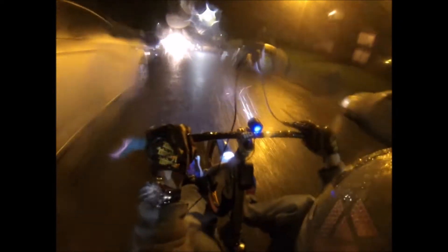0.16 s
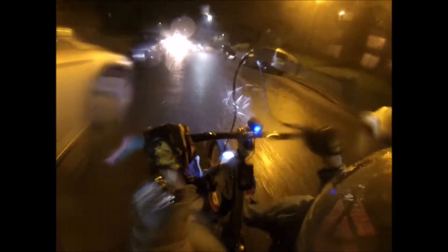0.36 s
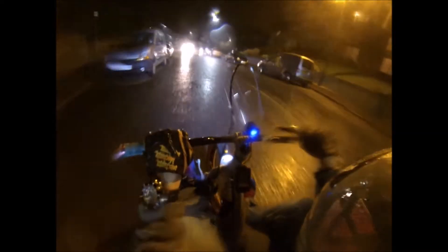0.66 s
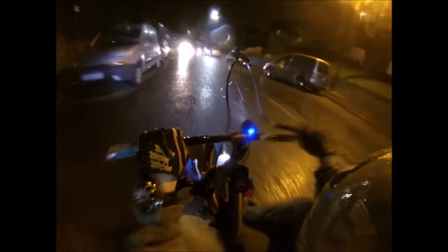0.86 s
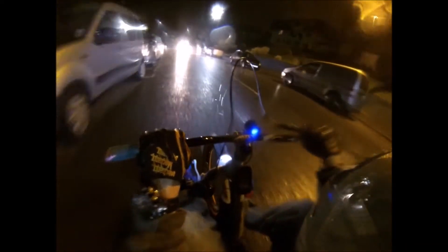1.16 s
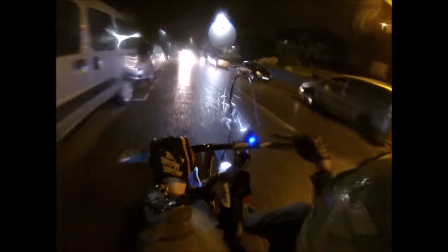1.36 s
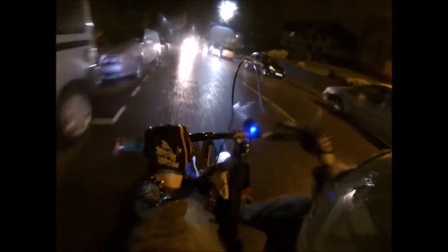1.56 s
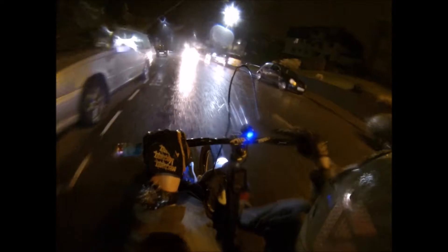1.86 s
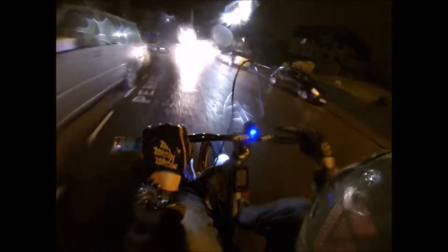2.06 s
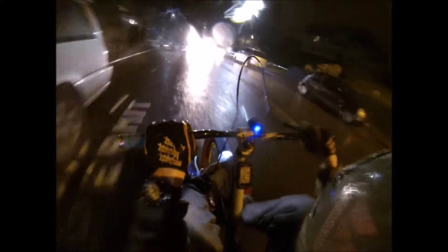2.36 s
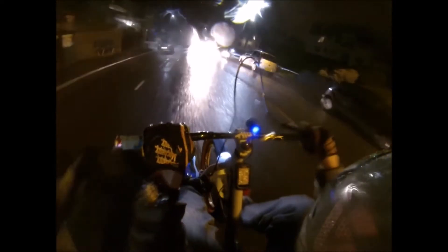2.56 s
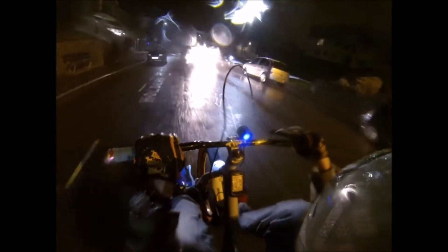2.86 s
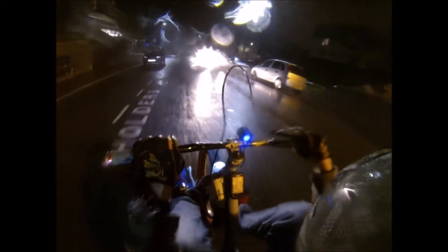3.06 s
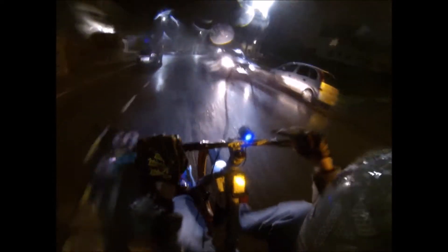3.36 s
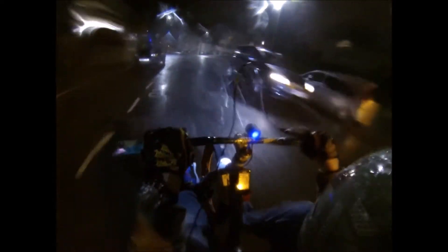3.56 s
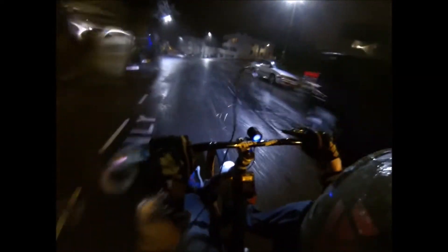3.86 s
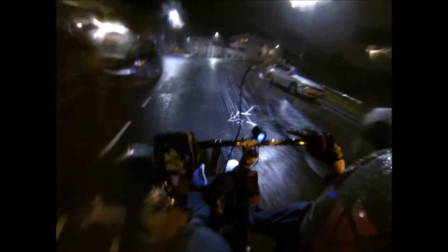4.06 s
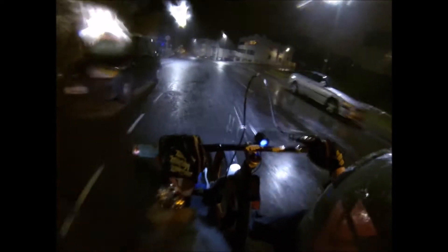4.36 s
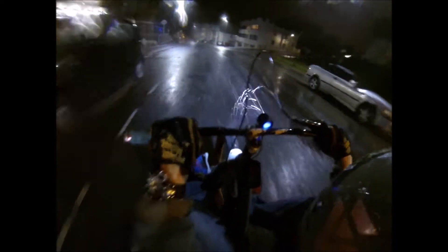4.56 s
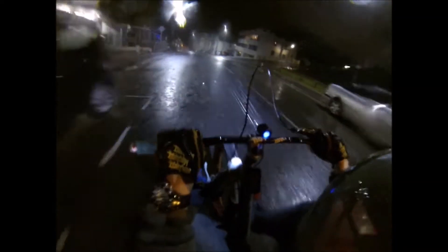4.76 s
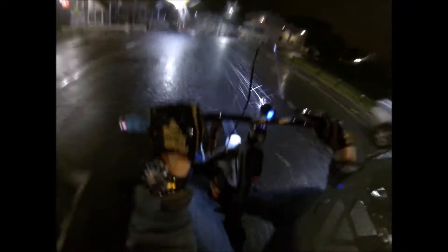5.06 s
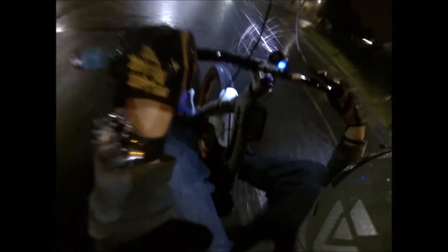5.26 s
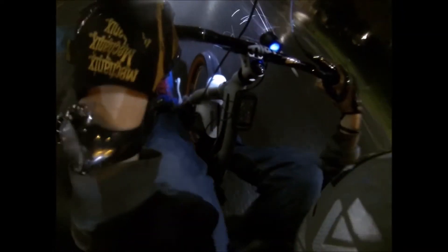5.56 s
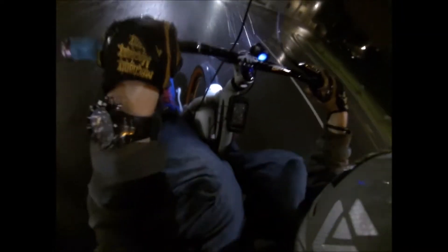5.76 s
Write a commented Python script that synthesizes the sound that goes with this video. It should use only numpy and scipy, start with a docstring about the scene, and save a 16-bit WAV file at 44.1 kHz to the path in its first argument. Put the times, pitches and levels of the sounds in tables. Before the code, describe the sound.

From the start, a drift trike's wheels roar over wet asphalt, heard close from an on-board microphone inside a waterproof case. The roar is hollow and boxy, with a watery hiss above it and road rumble, vibration and deep wind buffeting below. It runs for about six seconds, swelling around 0.3, 1.3, 2.6, 4 and 4.8 seconds and easing briefly in between.

Water patters on the case throughout as fine spray and sharp, irregular smacks. The hardest drops land in the first half second and near 1.4, 2.7, 3.1, 4.1, 5.2 and 5.7 seconds.

Bumps knock the frame dully at about 1.3, 3 and 3.7 seconds, with a low shudder around 3 seconds. Loose metal fittings clack near 1.7 and 2.6 seconds, then several times in quick succession at 5.6 seconds. The wheels are still rolling at the end.

```python
"""The wheels of a drift trike roar down a wet road at night, heard close from on board: one microphone
in a waterproof camera case. The roar rings the hollow case, the asphalt rumbles, the water film hisses.
Water thrown up by the front tyre smacks the case, right at the microphone. Bumps knock the frame and
loose fittings clack. Underneath, the rough road shakes the mount and wind buffets the case."""
import sys
import numpy as np
from scipy import signal
from scipy.fft import rfft, irfft
from scipy.io import wavfile
from scipy.ndimage import uniform_filter1d

SR = 44100
rng = np.random.default_rng(int(sys.argv[2]) if len(sys.argv) > 2 else 0)


def wrap_up_sound(samples):
    """Save the sound to the file named by the first command line argument, as 16-bit audio."""
    columns = np.atleast_2d(samples).T
    # keep every value between -1 and 1, then stretch to whole-number steps
    tamed = np.clip(columns, -1, 1)
    steps = np.round(tamed * 32767).astype(np.int16)
    wavfile.write(sys.argv[1], SR, steps)


N = 260190

# How hard the wheels grind and how much water they throw up: t/s, roar level/dB, spray level/dB
WHEEL_LEVELS = [(0.0, -25.5, -39.5), (0.12, -27, -37.5), (0.25, -25, -39), (0.36, -24, -32.5),
                (0.5, -26.5, -39.5), (0.85, -31, -44), (1.13, -27, -42.5), (1.28, -25, -37.5),
                (1.42, -29, -43.5), (1.62, -30.5, -44.5), (1.9, -27, -40.5), (2.25, -26, -37.5),
                (2.48, -24, -37.5), (2.63, -23, -37.5), (2.79, -23.5, -40), (2.95, -25, -39),
                (3.06, -24, -34), (3.16, -30, -41), (3.38, -31, -41.5), (3.72, -27, -36),
                (3.89, -26, -37.5), (4.25, -26, -38.5), (4.5, -31.5, -40.5), (4.64, -31, -42.5),
                (4.8, -25.5, -36), (5.01, -29, -39), (5.15, -25.5, -38.5), (5.31, -32.5, -46.5),
                (5.52, -32.5, -48), (5.63, -26.5, -40), (5.78, -29.5, -46), (5.9, -29, -43)]
# The roar as it sounds inside the hollow case: f/Hz, level/dB
ROAR_SPECTRUM = [(500, -67), (850, -42), (1000, -17.5), (1150, -9), (1300, 0.5), (1400, 1), (1580, 0),
                 (1800, -12.5), (2000, -16), (2400, -16), (4000, -49)]
# The water film under the tyres: f/Hz, level/dB
WATER_SPECTRUM = [(1300, -17), (2000, -2), (2400, -1.5), (2750, 2.5), (3300, -2.5), (3850, -9.5),
                  (4150, -8), (4650, -14.5), (5000, 1), (5400, -12), (7000, -21.5), (14000, -39),
                  (16000, -70)]
def wheels(grit, swell):
    """Close by, tyres grind over wet grit: the roar rings the case's cavity and the water film hisses."""
    roar = coloured(noise() * gain_of(2 * grit), ROAR_SPECTRUM)
    hiss = coloured(noise() * gain_of(3 * grit - 1.5 * wander(250)), WATER_SPECTRUM)
    roar *= gain_of(1 + 0.3 * swell) * level(WHEEL_LEVELS)
    hiss *= gain_of(3.5 * swell) * level(WHEEL_LEVELS, column=2)
    return roar + hiss


# The roughness of the asphalt passing under the trike: t/s, rumble level/dB
ROAD_LEVELS = [(0.0, -35.5), (0.12, -36), (0.22, -42.5), (0.35, -39), (0.5, -42), (0.8, -46.5), (1.05, -41),
               (1.33, -40.5), (1.43, -47.5), (1.6, -46), (1.8, -42), (2.3, -38), (2.62, -38), (2.76, -40),
               (3.0, -38), (3.2, -43), (3.7, -38), (4.0, -38.5), (4.3, -39.5), (4.6, -43), (4.8, -39.5),
               (5.1, -39.5), (5.27, -45), (5.45, -43.5), (5.9, -38.5)]
# Its rumble at the microphone: f/Hz, level/dB
ROAD_SPECTRUM = [(60, -21), (130, 10.5), (230, 5), (350, 3), (600, -1.5), (900, 0), (1500, 4), (4000, -56)]
def road_rumble(grit, swell):
    """The tyres rumble over the asphalt below, louder where it is rough."""
    rumble = coloured(noise() * gain_of(grit), ROAD_SPECTRUM)
    return gain_of(0.3 * swell) * level(ROAD_LEVELS) * rumble


# Resonances of the case around the microphone, all four: f/Hz, width/Hz, level/dB
HOLLOW_MODES = [(1400, 60, 0.18), (1534, 660, -1.1)]  # the cavity's hollow ring
WALL_MODES = [(2347, 770, 16), (2710, 180, 25.5), (3040, 250, -2)]  # the ring of the wall
SNAP_MODES = [(4350, 1400, 1), (5100, 180, 9.5), (6090, 420, 0)]  # the snap of the shell
FIZZ_MODES = [(7800, 1100, 0), (10500, 3000, -3), (13000, 2000, -12)]  # the fizz on top
def drop(hollow_db, snap_db, fizz_db, wall_hz, snap_hz, splash=0.62):
    """A drop bursts on the case; the spot it hits sets the pitch of the wall and of the shell."""
    t = np.arange(1024) / SR
    burst = splash * (np.exp(-t / 0.0011) + gain_of(-25) * np.exp(-t / 0.0087))
    force = (t == 0) + burst * noise(len(t))
    force = signal.sosfilt(butter(3, 1150, "high"), force)  # the stiff case passes little bass
    detune = 1 + 0.06 * rng.uniform(-0.91, 1)
    parts = [(HOLLOW_MODES, hollow_db, detune),
             (WALL_MODES, 0, wall_hz / WALL_MODES[1][0]),
             (SNAP_MODES, snap_db, snap_hz / SNAP_MODES[1][0]),
             (FIZZ_MODES, snap_db + fizz_db, detune)]
    out = 0
    for k, (modes, db, stretch) in enumerate(parts):
        band_hz = [modes[0][0] * stretch * 0.83, min(modes[-1][0] * stretch * 1.18, 0.45 * SR)]
        sound = signal.sosfilt(butter(2, band_hz), ring(force, modes, stretch))
        polarity = (-1) ** k  # neighbouring modes swing in opposite senses
        out += polarity * gain_of(db) * sound / rms(sound[t < 0.004])
    return out


# Drops that smack the case one by one, from hard smacks to faint ticks: t/s, wall level/dB, hollow/dB re wall,
# # snap/dB re wall, fizz/dB re snap, wall f/Hz, shell f/Hz
TIMED_DROPS = [(0.0812, -5, -18, -11, -19, 2720, 5700), (0.119, -7.5, -4.5, -2.5, -8, 2920, 5360),
               (0.1385, -13.5, -1, 1, -6, 2700, 4530), (0.1426, -15, -13.5, -6.0, -12.5, 2350, 4060),
               (0.16, -12, -3, -17, -7.0, 2570, 5100.0), (0.1737, -27, -4, -3, 1, 2700, 5000),
               (0.182, -27, -4, -1, -1, 2600, 4900), (0.224, -15.5, -3, -2, -3.5, 2780, 4960),
               (0.2571, -21.5, -2, 1, -2, 2860.0, 4500.0), (0.3077, -25.5, 3, 1, -3, 2700, 4820),
               (0.3355, -20.5, 4, -12, 9, 3400, 4720.0), (0.342, -13.5, 0, -7.5, 1, 2940, 5640.0),
               (0.358, -22, 1, 2, -8, 2600, 4500), (0.367, -13.5, 0, -1, 0, 2600, 4200),
               (0.386, -5.5, -15, -5.5, -1.5, 2700, 4370), (0.391, -13, -14, 5, -7.0, 2670, 5140),
               (0.421, -23, -7, 0, -16, 2800.0, 4560), (0.4279, -8.5, -8, -11, -3, 2740, 5500),
               (0.4346, -16, -7, -12.5, -3, 2840.0, 5490.0), (0.469, -25.5, -4, 10, -8, 2560, 5200),
               (0.4844, -15.5, -16, -7, -6, 2900, 4970.0), (0.6058, -33.5, 3, 9.5, -20, 2880, 4070),
               (0.6277, -28.5, -11.5, 6.5, -6, 3170, 5360), (0.6432, -20.5, -15, -5, -8, 2800, 5040),
               (0.668, -8.5, -7, -15.5, 6, 2870, 5060), (0.7772, -21, -4, -5, 1, 2600, 4900),
               (0.8177, -18.5, -3, -5.5, -1, 2600, 4800), (0.9522, -27, 10.5, 5.5, -5, 3170, 4760),
               (1.0993, -38, -4, -6, 15, 2700, 4960), (1.1494, -11, -12, -8, -7, 2730, 4900),
               (1.1717, -28.5, -4, 3, -10, 2700, 5100), (1.1921, -35, -10, 2.5, 2, 2600, 4900),
               (1.2865, -13.5, -2.5, 3, -15, 2470, 5500), (1.326, -25.5, 3, 4, -8, 2800, 4900),
               (1.3732, -4.5, -10, -9, 1.5, 2700, 4350), (1.4743, -34, -4, 6, 0.5, 2700, 5070),
               (1.5228, -7, -10, -7, -10, 2770, 4980), (1.5381, -19.5, 2.5, -10, -11, 2600, 5860.0),
               (1.6036, -29.5, -7.5, 2.5, 1, 2710.0, 4280), (1.6821, -26, 9.5, -12, -5, 2270, 5000),
               (1.69, -17.5, -21.0, -27, -8.0, 2800, 5700), (1.7298, -38, 23.5, 6, -3, 2540.0, 4100),
               (1.7662, -27.5, 0, 1, 0, 2600, 5000), (1.772, -21.5, -12, -7, -7, 2700, 4970),
               (1.8105, -22, -6, -22, -16, 2610, 4800), (1.913, -30, -7.0, 2, 2, 2670.0, 4470),
               (1.9166, -27, 2, -4, -12, 2680, 4900), (1.9282, -25.5, -4, -1, -2, 2760, 5070),
               (1.967, -21, 3, -2.5, -7, 2600, 4950), (1.9802, -14, 3.5, -11, -13, 2710.0, 4350.0),
               (2.072, -21.5, 4, 2, -7, 2820, 4630), (2.087, -26, 5, -2, 1, 2700, 5040),
               (2.1965, -12, -20.0, -5, -6, 2660, 6130), (2.2176, -19, -12, -0.5, -17, 2780, 6400),
               (2.229, -20, -14, -0.5, -5, 2710.0, 4940), (2.237, -27, -10.5, -3, -10, 2700, 4850),
               (2.2431, -19, -17, -8.5, 7, 2660, 5460), (2.271, -24, -12, -6, 9, 3250.0, 5000),
               (2.319, -25, 5, 4.5, -8, 2850, 4870), (2.331, -24, -6, 0, -4, 2700, 5300),
               (2.3459, -27, 1, 8, -11, 2520.0, 5250), (2.357, -20.5, 4.5, 3.5, -5, 2900, 5560.0),
               (2.4136, -12, 3, -25, -16, 2480, 5100), (2.46, -25, 12, -2, -2, 2700, 4900),
               (2.501, -21, -5, -4.5, -4, 3000, 5140), (2.5475, -18.5, -9, 1, -5, 2540, 5330),
               (2.556, -28.5, -3, 7.5, -3, 2700, 5060), (2.5618, -26, 2, 0, -10, 2840, 5300),
               (2.5917, -25.5, -5, 0, -18, 2760.0, 4820.0), (2.6224, -14.5, -4, 0, -12, 2830, 5530.0),
               (2.654, -6, -23, -9.5, -21, 2850, 5500), (2.6636, -5.5, -1.5, -6, -12, 2860, 5000),
               (2.7293, -20.5, -1, -3, -5, 2700, 4290.0), (2.7402, -17.5, -12, 3.5, -3, 2500, 4800),
               (2.755, -7, -21, -12.5, 6.5, 2730, 5200), (2.8667, -21, 5, 3, -24, 2750, 4460),
               (2.9349, -33, 8.5, 4.5, 6.5, 2700, 4930), (3.0068, -18.5, 2, -0.5, -10.5, 2590, 4800),
               (3.0242, -29, 10, 3, -2, 2600, 4700), (3.0841, -8, -5, -3, -9, 2660, 4300),
               (3.0973, -21.5, 4.5, -4, 5, 2680, 4960), (3.1463, -14, -17, 0, -1.5, 2950, 5100),
               (3.1596, -21, -3, -5.5, -4, 2750, 5000), (3.1757, -26, 7, -5.5, -9, 2630, 4770),
               (3.2934, -38.5, -4, 7, 0, 2700, 5100), (3.3351, -26.5, 4.5, -4, -3, 2800, 4860),
               (3.608, -25, 3, 4.5, -5, 2860, 5350), (3.6315, -26, -12, 4, 0, 2500, 5000),
               (3.655, -21.5, 5.5, -4, -1, 2730, 5000), (3.6736, -21, 5, 3.5, -1.5, 2670.0, 4900),
               (3.6895, -20, -10, -13, -13, 2780, 4900), (3.735, -23.5, 8, -1.5, 2.5, 2540.0, 4040),
               (3.7586, -27, 0, 3, -10, 3170.0, 4500.0), (3.7706, -11.5, 2.5, -2, -7.5, 2590, 4420),
               (3.8063, -11.5, -26, -8, -1, 2710.0, 4560), (3.8382, -18, -8, -5.5, 2.5, 2750, 5000),
               (3.8422, -23, 9, -2, -1, 3400, 4750), (3.874, -14, -11, -9, -12.0, 2790, 5430),
               (3.9325, -14, -14, -8, -4, 2780, 5000), (3.945, -23.5, 5, -1, -9, 2680, 4570),
               (4.0236, -21, 8.5, 5.5, -1, 2750, 4800), (4.035, -25, -9, 4, -1, 2700, 5100),
               (4.0584, -17.5, -2, -9.5, -2, 2720, 4970.0), (4.0831, -7, -19.0, -3, -10.5, 2810, 5350),
               (4.135, -26, 2, -4, 3, 2680, 4970), (4.168, -24.5, 10.5, -4, -4, 2670, 4060),
               (4.2008, -22.5, 8, -2.5, 3, 3300, 4840), (4.2206, -29.5, 2.5, 5, -8, 3060, 4630),
               (4.261, -17.5, 6.5, 2, -10, 2660, 4400), (4.359, -9.5, -4.5, -1.5, -13, 2480, 5080),
               (4.4, -15.5, -17.5, -20, -6, 2800, 4100), (4.4154, -31, -2.5, 8.5, 3, 3380.0, 4130),
               (4.4268, -13, -6, 2, -14, 2640, 4770), (4.53, -17, -2, -4, 8.5, 3300, 4260),
               (4.5534, -16, 5, 0, 8, 2870, 5000), (4.5977, -31.5, 10, 8.5, 2.5, 2670, 4600),
               (4.6652, -25, 8.5, 2.5, -1, 2700, 5000), (4.7679, -18.5, -10, -3.5, -1, 2310, 5200),
               (4.777, -16.5, -12.5, -2.5, -4.5, 2720, 4940), (4.788, -23.0, -10.5, -3, 9, 3480, 4700),
               (4.8005, -18.5, -21, -2, -14.5, 2560, 4120), (4.81, -24, -2, -11, -20.5, 3250, 4200),
               (4.82, -24, -8, -9, -16, 2500, 4200), (4.9051, -16.5, -9, -22.5, -7.5, 2600, 5070),
               (4.922, -23.5, -4, -3, 9.5, 3360, 4950), (4.9586, -26, -9, 2.5, -13.5, 2880, 5660),
               (5.0802, -20.5, -7.5, -9, -2.5, 2630, 4930), (5.0946, -22, 6, -2, -3, 2650, 4900),
               (5.1085, -8.5, -19, -5.5, -13.5, 2840, 5240), (5.149, -19.5, -17.5, -3.5, -3, 2880, 5470),
               (5.2106, -7.5, -8.5, -7, -4.5, 2650, 5160), (5.2157, -10, 1, 2, -16, 2800, 4800),
               (5.23, -38.5, 4, 19.5, -9, 2710.0, 5400), (5.2507, -23, 2, -5, 3, 3300, 4100),
               (5.2865, -17, -20, -5, -30, 2800, 6150), (5.539, -21, 2.5, -5.5, -3.5, 2570, 5000),
               (5.6137, -17, 1.5, 0.5, -9, 2820, 6060), (5.6566, -14.5, 0.5, 5, -4.5, 2730, 4570),
               (5.6929, -7, -7.5, -3, -4.5, 2686, 5100), (5.8328, -26, -19, 2, -6, 2820, 5600)]
def timed_drops():
    """Drops off the front tyre smack the case one by one, right at the microphone, from hard smacks to faint
    ticks."""
    out = np.zeros(N)
    for s, db, hollow_db, snap_db, fizz_db, wall_hz, snap_hz in TIMED_DROPS:
        smack = drop(hollow_db, snap_db, fizz_db - 1, wall_hz, snap_hz, splash=0.15)
        add(out, s, gain_of(db - 3) * smack)
    return out


def spatter(db=-37, usual_per_s=15):
    """Middling drops land on the case at uneven intervals, more often where more spray flies."""
    out = np.zeros(N)
    drops_due = np.cumsum(usual_per_s * wetness() ** 1.7) / SR
    draws = rng.uniform(-1.1, 1, (int(drops_due[-1]), 7))
    for k, (jitter, size, hollow, snap, fizz, *spot) in enumerate(draws):
        tick = drop(5 * hollow, 5 * snap - 1, 5 * fizz - 2, *spot_pitches(*spot))
        add(out, np.searchsorted(drops_due, k + jitter) / SR, gain_of(db + 3 * size) * tick)
    return out


def fine_spray(db=-53, spots=36, usual_per_s=190):
    """Tiny drops patter on the case in clumps, thicker and louder where more water flies."""
    out = np.zeros(N)
    clumps = unit_rms(gain_of(5 * wander(30)))
    per_s = usual_per_s * wetness() ** 0.61 * clumps
    for hollow, snap, fizz, *spot in rng.uniform(-1.8, 1, (spots, 5)):
        size = gain_of(3.5 * np.minimum(rng.exponential(1, N), 2.5))
        hits = size * (rng.random(N) < per_s / spots / SR)
        tick = drop(6 * hollow - 3, 5 * snap + 2, 6 * fizz, *spot_pitches(*spot))
        out += signal.oaconvolve(hits, tick)[:N]
    return gain_of(db) * wetness() ** 0.35 * out


# Bumps that knock the frame: t/s, level/dB, chatter decay/s
BUMPS = [(0.951, -37, 0.0064), (1.283, -29.5, 0.014), (1.322, -31, 0.0073), (1.729, -33, 0.0029),
         (2.961, -27, 0.0029), (3.021, -27.5, 0.028), (3.673, -27, 0.0069), (3.757, -39, 0.004),
         (4.258, -38, 0.0053), (5.62, -37, 0.007)]
# Resonances of the trike's frame: f/Hz, width/Hz, level/dB
FRAME_MODES = [(565, 51, 2), (733, 58, 7.5), (900, 370, -20.5), (1270, 230, 10.5)]
def frame_knocks():
    """A bump makes the joints chatter, and the frame rings dully, close to the case."""
    out, t = np.zeros(N), np.arange(8192) / SR
    for s, db, decay_s in BUMPS:
        chatter = noise(len(t)) * np.exp(-t / decay_s)
        knock = signal.sosfilt(butter(2, [450, 1500]), ring(chatter, FRAME_MODES))
        add(out, s, gain_of(db) * knock / rms(knock[t < 0.02]))
    return out


# Loose fittings striking the frame: t/s, level/dB, f/Hz
FITTING_HITS = [(1.7311, -16.5, 1210), (2.6427, -12, 1580), (5.5865, -15, 1320), (5.6113, -15, 1270),
                (5.6201, -10.5, 1260), (5.6432, -20, 1400)]
# Resonances of a metal fitting: f/Hz, width/Hz, level/dB
FITTING_MODES = [(2160, 400, 5), (4000, 200, 8)]
def fitting_clacks(peak_s=0.00142, clink_db=-15, clink_decay_s=0.0032):
    """Nearby, loose fittings clack against the frame: a few hollow cycles and a thin metal clink."""
    out, t = np.zeros(N), np.arange(1024) / SR
    envelope = (t / peak_s) ** 2 * np.exp(2 - 2 * t / peak_s)
    for s, db, hz in FITTING_HITS:
        clack = envelope * np.sin(2 * np.pi * hz * t)
        clink = ring(noise(len(t)) * np.exp(-t / clink_decay_s), FITTING_MODES)
        clink *= gain_of(clink_db) / rms(clink[t < 0.004])
        add(out, s, gain_of(db) * (clack + clink))
    return out


# Dips in the road that swing the mount: t/s, sway level/dB
ROAD_DIPS = [(1.29, -31), (2.6, -24.5), (2.93, -18.5), (3.02, -26), (3.71, -28), (3.99, -20), (4.42, -22.5),
             (4.6, -28.5), (4.859, -24.5), (5.02, -34), (5.88, -33)]
# The mount's lowest resonance: f/Hz, width/Hz, level/dB
SWAY_MODES = [(66.8, 5.3, 0)]
def mount_sway(db=-33.5, dip_width_s=0.028):
    """Rough asphalt keeps the mount swaying under the microphone; dips in the road swing it harder."""
    t = np.arange(N) / SR
    swing = gain_of(db) * roughness() ** 0.72
    for s, dip_db in ROAD_DIPS:
        jolt = gain_of(dip_db - 1) * np.exp(-0.5 * ((t - s) / dip_width_s) ** 2)
        swing = np.hypot(swing, jolt)
    spectrum = [(45, -23), (61, -2), (74, -3.5), (100, -31), (1000, -80)]  # f/Hz, level/dB
    sway = swing * steadied(coloured(ring(noise(), SWAY_MODES), spectrum), seconds=0.38)
    return signal.sosfiltfilt(butter(2, [55, 82]), sway)  # the heavy mount swells and settles slowly


# The mount's higher resonances: f/Hz, width/Hz, level/dB
SHUDDER_MODES = [(166, 9.4, 6), (524, 38, -16.5), (693, 38, -13)]
def mount_shudder(db=-34):
    """The road keeps the mount's higher resonances ringing, louder on rough asphalt."""
    spectrum = [(60, 21), (150, -3), (190, 1), (300, -14.5), (600, 1), (800, -10), (2000, -13)]
    shudder = coloured(ring(noise(), SHUDDER_MODES), spectrum)
    return gain_of(db) * roughness() ** 1.01 * steadied(shudder, seconds=0.36)


# Wind on the case: t/s, level/dB
WIND_LEVELS = [(0.0, -19), (0.26, -27), (0.34, -31.5), (0.6, -32.5), (0.93, -32), (1.1, -24.5),
               (1.3, -26.5), (1.45, -32), (2.05, -29), (2.18, -24.5), (2.6, -25), (2.7, -26.5),
               (3.2, -30.5), (3.35, -25), (4.3, -29), (4.41, -22), (4.52, -30), (4.8, -25), (5.15, -35),
               (5.55, -33), (5.67, -25), (5.9, -29)]
# Its deep buffeting at the microphone: f/Hz, level/dB
WIND_SPECTRUM = [(3, -11), (11, 2.5), (28, 0.5), (36, 3.5), (48, -19), (90, -25.5), (200, -62), (500, -62)]
def wind():
    """Eddies push directly on the case."""
    eddies = steadied(coloured(noise(), WIND_SPECTRUM), seconds=0.12)
    return gain_of(1.5) * level(WIND_LEVELS) * eddies


# The hiss behind everything: f/Hz, level/dB
HISS_SPECTRUM = [(3000, -10), (5000, 0), (8000, 2), (10000, -2), (12600, -3), (12950, 14), (13400, -3),
                 (14500, -14), (16000, -45)]
def faint_hiss(db=-63):
    """A faint steady hiss with a thin sizzle on top."""
    return gain_of(db) * coloured(noise(), HISS_SPECTRUM)


def spot_pitches(wall_spot, shell_spot, spread=0.12):
    """The pitches in Hz of wall and shell at one spot on the case."""
    return 2750 * (1 + spread * wall_spot), 5100 * (1 + spread * shell_spot)


def wetness(usual_db=-39):
    """How much spray flies, relative to usual."""
    return level(WHEEL_LEVELS, column=2) / gain_of(usual_db)


def roughness(usual_db=-38):
    """How rough the asphalt is, relative to usual."""
    return level(ROAD_LEVELS) / gain_of(usual_db)


def gain_of(db):
    """Decibels to amplitude."""
    return 10 ** (np.asarray(db) / 20)


def rms(x):
    """Root mean square."""
    return np.sqrt(np.mean(x ** 2) + 1e-20)


def unit_rms(x):
    """Scales to rms 1."""
    return x / rms(x)


def noise(samples=N):
    """White noise."""
    return rng.standard_normal(samples)


def level(rows, column=1):
    """One dB column of a curve, as a gain for every sample."""
    rows = np.asarray(rows)
    return gain_of(np.interp(np.arange(N) / SR, rows[:, 0], rows[:, column]))


def add(mix, s, sound):
    """Mixes a sound in at s seconds."""
    part = mix[max(0, round(s * SR)):][:len(sound)]
    part += sound[:len(part)]


def butter(order, hz, kind="band"):
    """Filter sections with a flat passband."""
    return signal.butter(order, hz, kind, fs=SR, output="sos")


def coloured(x, spectrum):
    """Filters by (f/Hz, level/dB) points; rms 1."""
    hz, db = np.transpose(spectrum)
    bins = np.fft.rfftfreq(N, 1 / SR)
    response = gain_of(np.interp(np.log(bins + 0.1), np.log(hz), db))
    return unit_rms(irfft(rfft(x) * response, N))


def wander(hz):
    """Random drift up to about this rate; rms 1."""
    bins = np.fft.rfftfreq(N, 1 / SR)
    return unit_rms(irfft(rfft(noise()) / (1 + (bins / hz) ** 4), N))


def ring(force, modes, stretch=1):
    """Sends a force through parallel resonances, their pitches scaled by stretch."""
    out = 0
    for hz, width, db in modes:
        b, a = signal.iirpeak(min(hz * stretch, 0.45 * SR), hz / width, SR)
        out += gain_of(db) * signal.lfilter(b, a, force)
    return out


def steadied(x, seconds):
    """Takes the slow swells out of a narrow noise, leaving its fast beating."""
    return x / np.sqrt(uniform_filter1d(x ** 2, int(seconds * SR) + 1) + 1e-12)


def limiter(x, threshold_db=-3.5, recovery_db_per_s=28, attack_s=0.0016):
    """Lets the first cycles of a smack through, ducks, and recovers slowly."""
    fall_db = np.arange(N) / SR * recovery_db_per_s
    peak_db = np.maximum.accumulate(20 * np.log10(abs(x[0]) + 1e-6) + fall_db) - fall_db
    excess_db = np.maximum(peak_db - threshold_db, 0)
    pole = np.exp(-1 / (attack_s * SR))
    return x / gain_of(signal.lfilter([1 - pole], [1, -pole], excess_db))


def scene():
    """On board the trike, everything reaches one microphone through the case."""
    grit, swell = wander(hz=78), wander(hz=7)  # grains and patches of asphalt under the tyres
    rolling = wheels(grit, swell) + road_rumble(grit, swell)
    hiss = faint_hiss()
    water = timed_drops() + spatter() + fine_spray()
    shaking = frame_knocks() + fitting_clacks() + mount_sway() + mount_shudder()
    return (rolling + water + shaking + wind() + hiss)[None]


# What the case lets through to the microphone: f/Hz, level/dB
CASE_RESPONSE = [(20, 1.5), (12000, -12.5), (14000, -18), (15200, -21), (16500, -31)]
def record(dry):
    """The case dulls the top, the limiter ducks, the hardest smacks overload; the band ends at 16.3 kHz."""
    case_db = np.interp(np.fft.rfftfreq(N, 1 / SR), *np.transpose(CASE_RESPONSE))
    muffled = irfft(rfft(dry) * gain_of(case_db), N)
    ducked = limiter(muffled)
    soft_clipped = ducked / (1 + ducked ** 8) ** (1 / 8)
    lowpass = signal.firwin(255, 16300, window=("kaiser", 9), fs=SR)
    return signal.oaconvolve(soft_clipped, lowpass[None], "same")


dry = scene()
out = record(dry)
wrap_up_sound(out)
```